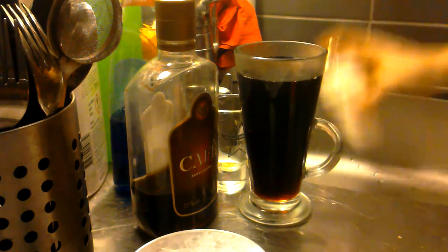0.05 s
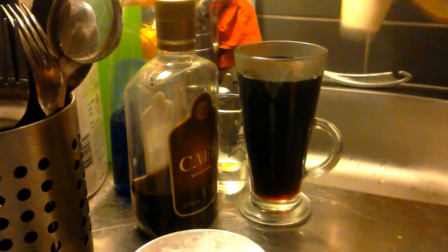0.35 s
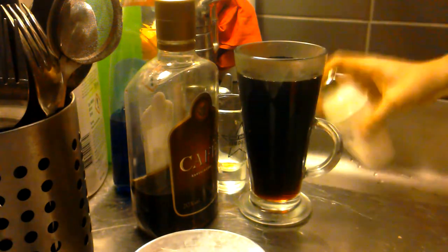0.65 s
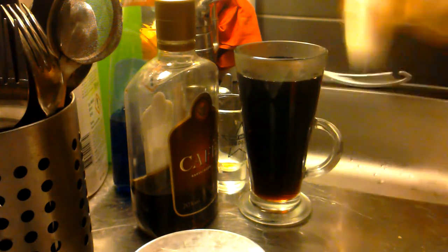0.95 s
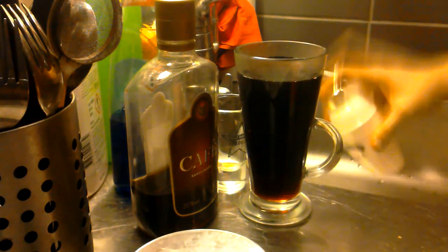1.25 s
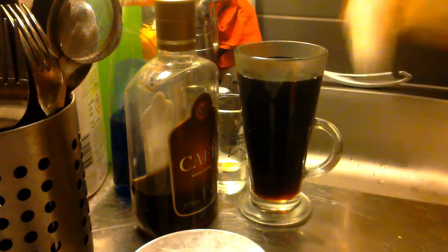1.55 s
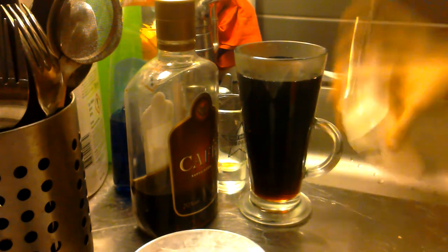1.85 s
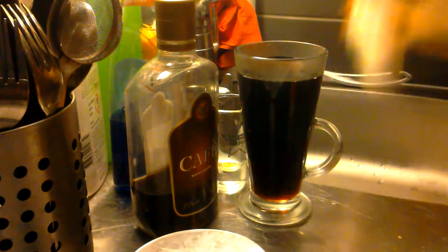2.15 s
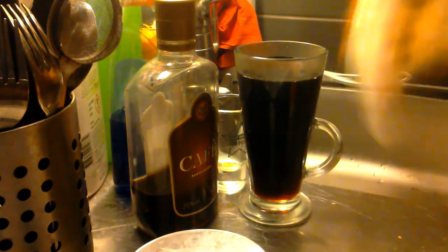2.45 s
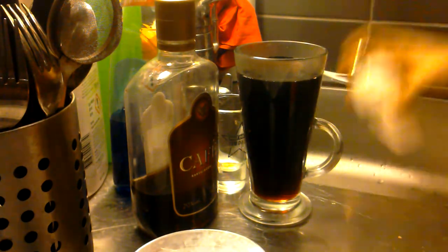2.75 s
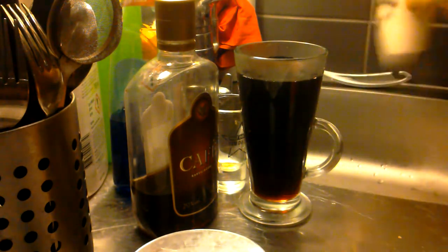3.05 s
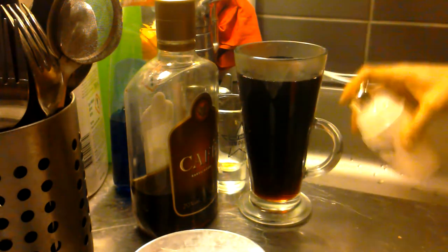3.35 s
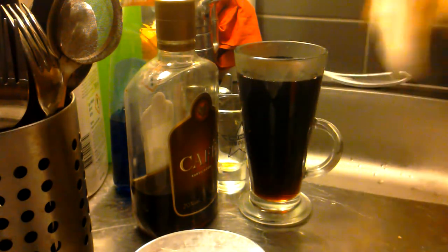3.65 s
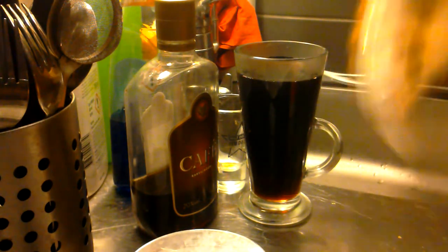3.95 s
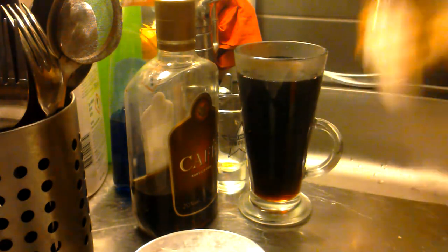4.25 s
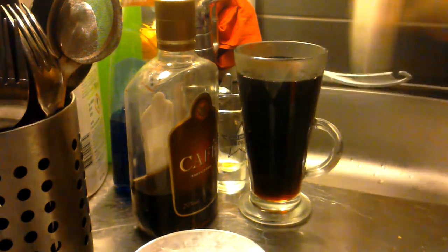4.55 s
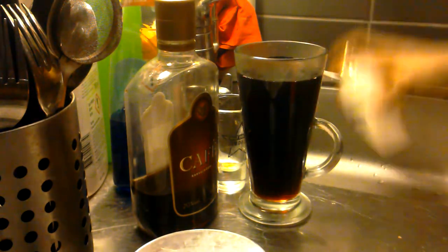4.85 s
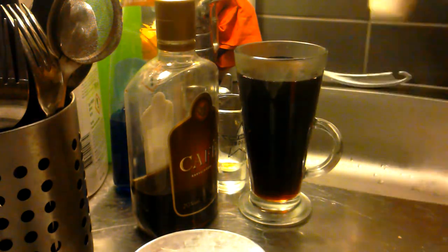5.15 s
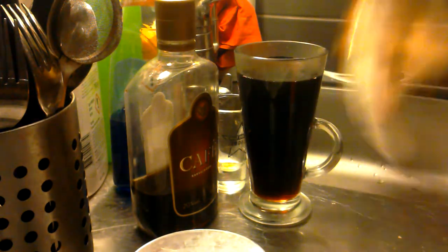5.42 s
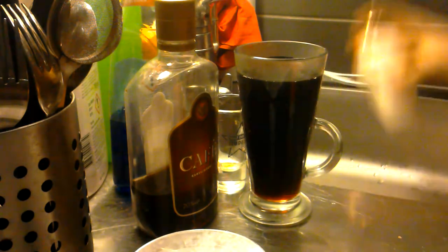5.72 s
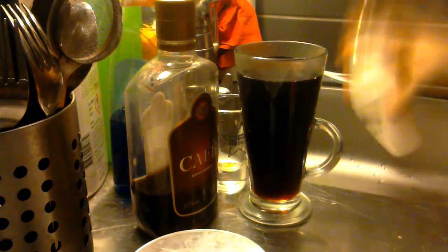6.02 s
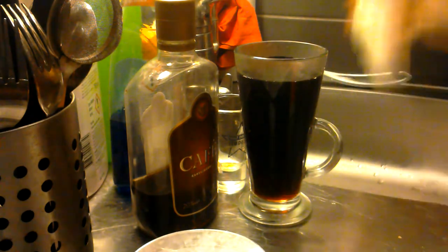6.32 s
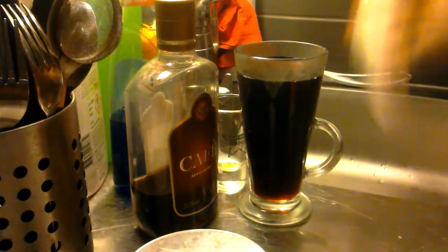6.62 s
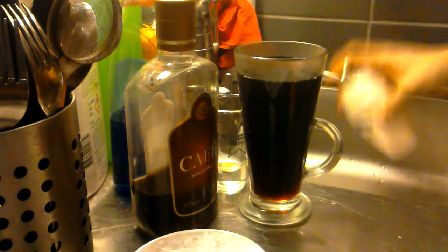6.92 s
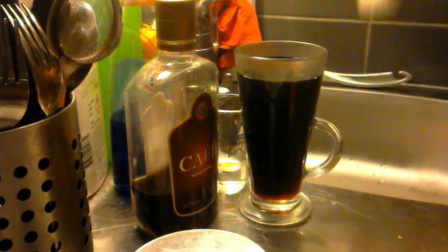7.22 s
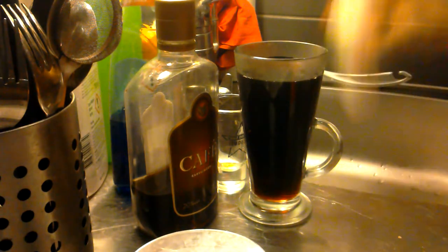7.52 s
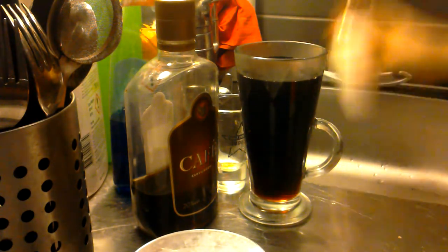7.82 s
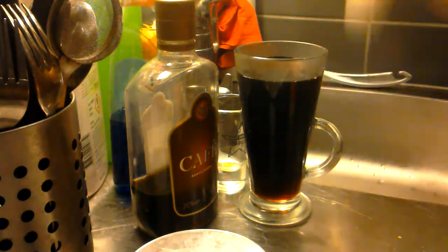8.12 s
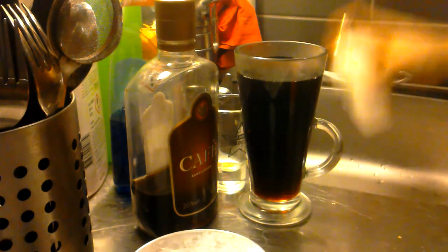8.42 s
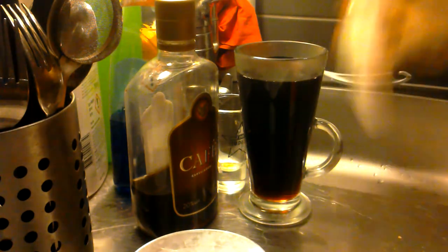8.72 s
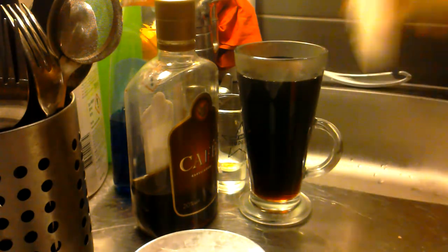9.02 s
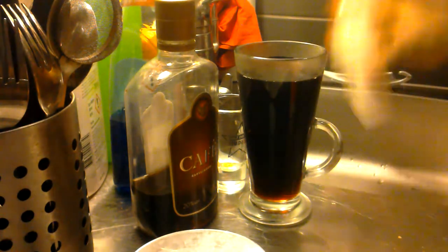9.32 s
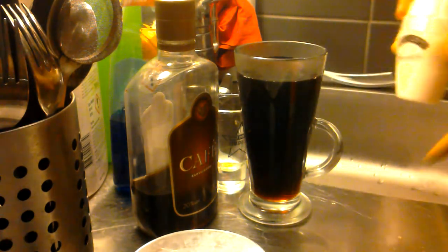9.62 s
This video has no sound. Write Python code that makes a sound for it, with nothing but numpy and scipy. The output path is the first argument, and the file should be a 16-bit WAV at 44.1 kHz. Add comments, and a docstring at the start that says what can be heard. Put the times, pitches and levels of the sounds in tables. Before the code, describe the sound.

Close by, liquid sloshes rapidly back and forth inside a small plastic bottle, about five shakes a second. Each turn gives a short, wet splash with spray, popping bubbles and a light hollow ring. After about nine seconds it settles with a faint hiss. Hard kitchen surfaces add a slight, short echo, over a quiet hum and a few soft bumps of stirred air.

```python
"""In a kitchen, a hand shakes a small, part-filled plastic bottle about five times a second.
At each turn the liquid hits an end of the bottle and breaks into spray and bubbles; trapped air rings
and the plastic wall thuds. A short fizz follows as the bottle comes to rest. Tiles and steel throw the
sound back, over a faint room hum and the low rumble of air stirred by the arm."""
import sys
import numpy as np
from scipy import signal
from scipy.fft import rfft, irfft, next_fast_len
from scipy.io import wavfile
from scipy.ndimage import uniform_filter1d

SR = 44100
rng = np.random.default_rng(int(sys.argv[2]) if len(sys.argv) > 2 else 0)


def dump(signal):
    """Clip the signal to [-1, 1] and save it as 16-bit WAV at the path in sys.argv[1]."""
    limited = np.clip(np.atleast_2d(signal).T, -1, 1)
    pcm = np.round(limited * 32767).astype(np.int16)
    wavfile.write(sys.argv[1], SR, pcm)


N = 430857

# A relative_db column only compares rows; the overall loudness is set where the table is used.
# tone of the steady room noise: frequency_hz, relative_db
ROOM_TONE = [(20, 5.5), (60, 1), (170, -2), (240, -13), (420, -6.5), (750, -11.5), (1000, -10.5),
             (2000, -11), (15500, -11)]
# hum of the mains and appliances: pitch_hz, level_db
HUM_NOTES = [(38.5, -70.5), (120, -70.5)]
# strength of the stirred air: time_s, rumble_relative_db, flutter_relative_db
AIR_STRENGTH = [(0, -60, -73), (1.63, -55, -60), (1.9, -57, -66), (2.83, -67.5, -62.5), (4.6, -54, -68),
                (7.3, -63.5, -68), (7.6, -56, -58.5), (9.31, -52, -59), (9.35, -37.5, -48.5),
                (9.52, -51.5, -61), (9.68, -55, -60), (9.77, -40, -44.5)]
# tone of the air's deep rumble: frequency_hz, relative_db
RUMBLE_TONE = [(10, -19), (25, -4.5), (40, -7), (62, -8.5), (100, -70), (250, -72)]
# tone of the air's higher flutter: frequency_hz, relative_db
FLUTTER_TONE = [(40, -61), (80, -2.5), (130, -3), (180, -2), (240, -55), (600, -44)]
# soft bumps of the hand and the stirred air: start_s, relative_db
HAND_BUMPS = [(1.07, -46), (1.299, -55), (1.67, -39.5), (5.787, -44), (8.699, -37), (9.34, -46.5),
              (9.431, -46)]
# time the kitchen's echo takes to fade by 60 dB: frequency_hz, fade_s
ECHO_FADE = [(300, 0.066), (1200, 0.17), (4500, 0.22), (15000, 0.053)]
# tone of the closing fizz: frequency_hz, relative_db
FIZZ_TONE = [(2000, -38), (7000, -5), (11000, 0), (16000, -4)]
# tone of the flexing plastic wall: frequency_hz, relative_db
THUD_TONE = [(90, -38), (150, -6), (185, -2), (240, -25.5), (320, -6.5), (500, -47)]
# tone of the splashing heard through the wall: frequency_hz, relative_db
SPLASH_TONE = [(150, -43), (250, -20), (420, -9.5), (750, -9), (900, -5), (1250, -1), (2000, -3),
               (3200, -1.5), (4600, 2), (6500, -2), (10000, -4), (14000, -9), (16000, -18)]
# notes at which the bottle and its air ring: pitch_hz, width_hz, boost_db
BOTTLE_NOTES = [(431, 56, 7), (573, 39, 9.5), (676, 16.6, 10), (865, 105, 7.5), (990, 42, 4), (1508, 14, 0),
                (1577, 13, -1), (2010, 71, 5.5), (2760, 150, 2)]
# notes of the free air after a slap: pitch_hz, width_hz, gain_db
SLAP_AIR_NOTES = [(465, 43, -8), (1490, 41, 4), (3430, 110, -10.5)]
# notes of the free air after a crash: pitch_hz, width_hz, gain_db
CRASH_AIR_NOTES = [(957, 50, -3.5), (2040, 120, -17)]
# large pockets of trapped air: start_s, pitch_hz, relative_db
AIR_POCKETS = [(0.226, 2930, -34.5), (0.443, 2780, -39), (0.764, 4130, -38), (0.792, 1850, -31),
               (0.85, 2830, -40), (1.25, 3720, -43), (1.412, 650, -38.5), (1.952, 1480, -37.5),
               (2.022, 4400, -31), (2.06, 4330, -26.5), (2.111, 3400, -30.5), (2.147, 1380, -38),
               (2.227, 2560, -26), (2.426, 2030, -32), (2.787, 1270, -33.5), (3.008, 1350, -38),
               (3.061, 667, -38), (3.085, 910, -38), (3.711, 2440, -30), (3.732, 2000, -34),
               (3.932, 982, -26), (4.073, 2780, -33.5), (4.275, 906, -37.5), (4.337, 4300, -30.5),
               (4.682, 1550, -35), (5.188, 890, -34.5), (5.405, 1330, -27), (5.593, 1930, -31.5),
               (5.717, 3370, -33), (5.755, 2980, -38), (6.372, 1950, -41), (6.534, 1130, -35),
               (6.622, 915, -40), (6.751, 1510, -34.5), (6.988, 1440, -36), (7.166, 1930, -43),
               (7.266, 1330, -34.5), (7.429, 1444, -39), (7.52, 630, -41), (7.887, 2890, -36),
               (8.165, 5000, -30.5), (8.259, 1190, -37), (8.332, 1314, -34), (8.389, 2080, -41),
               (8.497, 1530, -32.5), (8.531, 664, -36), (8.711, 1990, -36), (9.178, 2600, -39.5),
               (9.312, 2620, -36)]
# A splash has three bands: body (low), middle and spray (high). body_db and spray_db shift the outer two.
# the liquid slaps one end of the bottle: start_s, relative_db, rise_s, body_db, spray_db
END_SLAPS = [(0.064, -41, 0.035, -9, -1.5), (0.284, -36.5, 0.019, -4, -1.5), (0.506, -39, 0.0056, 3.5, 2),
             (0.698, -33, 0.016, -7, -5.5), (0.91, -45, 0.018, 4, 7.5), (1.122, -36.5, 0.0086, 3, 2),
             (1.315, -35.5, 0.017, -5.5, -6), (1.522, -33, 0.01, -3.5, -1), (1.726, -33.5, 0.013, -5, -3),
             (1.923, -37.5, 0.027, -3.5, -5), (2.137, -36.0, 0.015, -4, -4), (2.342, -38.5, 0.024, 2, -2.5),
             (2.562, -37.5, 0.0054, 3, -6), (2.762, -38, 0.0038, -2, -7), (2.999, -35.5, 0.0067, -2, -3.5),
             (3.2, -42.5, 0.013, 0, 0), (3.406, -39.5, 0.022, 0, -3), (3.637, -34, 0.0045, -7.5, -7.5),
             (3.843, -38.5, 0.016, -2, 1.5), (4.053, -33, 0.0071, -2, -2), (4.249, -37.5, 0.014, -16, -4),
             (4.469, -37.5, 0.004, 7, 2), (4.675, -35.5, 0.005, 3, 1.5), (4.879, -43, 0.024, 4, -1),
             (5.096, -39, 0.02, 3, -3), (5.294, -38.5, 0.029, -4, -4.5), (5.507, -42, 0.019, 2, -3),
             (5.708, -37, 0.007, -4.5, -1), (5.875, -36.5, 0.0029, -1, -7), (6.099, -34.5, 0.0038, 4, -4),
             (6.299, -40, 0.016, 1, -8), (6.52, -40.5, 0.0098, 2.5, -4), (6.743, -39, 0.008, 2.5, 1.5),
             (6.967, -41, 0.017, 2, -2), (7.152, -44, 0.059, -2, -5), (7.412, -38.5, 0.015, -1.5, -3),
             (7.611, -40, 0.002, -12, -9), (7.844, -36.5, 0.0027, -5, 0), (8.023, -34, 0.009, -1.5, -1.5),
             (8.247, -39, 0.007, 3, -2), (8.432, -40.5, 0.017, 7, -1), (8.619, -37, 0.004, 2.5, 0),
             (8.786, -40.5, 0.036, 5.5, -5), (8.995, -36.5, 0.01, 4, -2), (9.209, -39.0, 0.0033, 3, 0)]
# the liquid crashes into the other end; the last row is a faint, bright hiss as the shaking stops:
# time_s, relative_db, run_up_db, body_db, spray_db
CRASHES_AND_HISS = [(0.016, -43, 3, -1.5, -1), (0.171, -32.5, -3.5, 0.5, -1), (0.38, -31.5, -7, -2, 2),
                    (0.591, -35, -9, 2.5, 4), (0.792, -33, -3.5, 0, 3.5), (1.011, -35.5, -2.5, -0.5, -1),
                    (1.24, -41.5, -5, -17, -1), (1.409, -32.5, -3, -3, 0.5), (1.609, -33, -8, -1.5, 2.5),
                    (1.828, -43, 2, -16, 0.5), (2.019, -33, -13.5, -2.5, -0.5),
                    (2.228, -27.5, -13.5, -2, 1), (2.444, -32, -16, -3, 2.5), (2.661, -37.5, -11, -4, 3.5),
                    (2.866, -33.5, -11, 1, 2.5), (3.081, -34.5, -5.5, 3, -1.5), (3.291, -34.5, 0.5, 3.5, 1),
                    (3.507, -34.5, -9, -4, 1.5), (3.717, -29.5, -10, 0.5, -1.5),
                    (3.929, -30, -4.5, -0.5, -2.5), (4.142, -35.5, 0, -1.5, 0), (4.338, -33, -9, 4, 0),
                    (4.548, -38.5, -5.5, 2, 1), (4.748, -38.5, -18, -2, -4), (4.962, -41, 0.5, -2, -1),
                    (5.191, -36.5, -2.5, 1, 2), (5.4, -29.5, -14, 6, 1), (5.594, -35.5, -9, 3, -5),
                    (5.79, -31.0, -11.5, 4, -1), (5.981, -33.5, -9, 2.5, -1), (6.198, -41.0, -1, -6, -1),
                    (6.398, -50, -3, 5, 1), (6.593, -40, -7, 1.5, 0.5), (6.845, -34.5, -12, 3.5, -5),
                    (7.062, -30, -17, 0, -3.5), (7.284, -37.5, -5, 4.5, 0.5), (7.506, -32.5, -6.5, 2, 0),
                    (7.715, -36, -0.5, 1.5, 0), (7.887, -34.5, -6, -3.5, -2), (8.133, -43.5, 1, 2, 6),
                    (8.332, -36, 0.5, 2.5, -2), (8.496, -33.5, -8, -6, 0), (8.699, -32, -5, 1.5, -1),
                    (8.897, -32, -14.5, 1, 0), (9.087, -34.5, -15, 4, 3.5), (9.314, -38.5, -0.5, -8, -3.5),
                    (9.428, -52.5, 6.5, 3, 7)]
# stray lumps of liquid land between the turns: start_s, relative_db, brightness_db
STRAY_LUMPS = [(0.219, -43, 1), (0.564, -38, 1), (0.876, -40.5, 1), (0.968, -35, 1.5), (1.199, -37.5, 6.5),
               (1.385, -36.5, 2), (1.468, -45, 2), (1.577, -38.5, 2), (1.644, -46.5, 9), (2.057, -40.0, 0),
               (2.111, -53, -2), (2.422, -33.5, -6.5), (2.495, -44.5, 3), (2.787, -36.5, 0),
               (2.919, -56.5, 23), (2.969, -44, 1), (3.055, -40, 4), (3.343, -43.5, 2.5), (3.698, -44, 6),
               (3.894, -39, -2), (4.308, -42, 9), (4.772, -40, 0), (4.984, -39, 1), (5.375, -40, 1),
               (5.459, -42, -5), (5.651, -47, -7), (5.757, -40.5, -1), (5.897, -34, -2.5),
               (5.954, -39.5, -3), (6.234, -40, 6), (6.43, -42.5, -3.5), (6.616, -40, -1),
               (6.818, -39, 0.5), (7.039, -41, -9.5), (7.271, -39.5, -5), (7.64, -36.5, -4),
               (7.923, -40.5, -1), (8.052, -38, -4), (8.159, -41, 4.5), (8.378, -44.5, -1),
               (8.513, -34, -2), (8.572, -42.0, 4.5), (8.872, -34, 2.5), (8.939, -42.5, 1.5),
               (9.127, -42, 3), (9.178, -45, 2), (9.268, -40.0, -1), (9.54, -47, -9)]

# how each kind of surge dies away: collapse_s, churn_db, churn_s
SLAP_DRAIN, CRASH_DRAIN, LUMP_DRAIN = (.013, -11, 0.085), (0.014, -13.5, 0.042), (0.0093, -5.5, 0.023)
# time for the front of the liquid to meet the wall
SLAP_CONTACT_S, CRASH_CONTACT_S, LUMP_CONTACT_S = .008, .002, .007


def gain_of(db):
    """Turns decibels into a number to multiply a sound by."""
    return 10 ** (np.asarray(db) / 20)


def evened(x):
    """Scales a signal to an average strength (rms) of 1."""
    return x / np.sqrt(np.mean(x ** 2) + 1e-20)


def look_up(table, hz):
    """Reads between the rows of a table, on a scale where octaves are evenly spaced."""
    row_hz, value = np.transpose(table)
    return np.interp(np.log(hz + 1), np.log(row_hz + 1), value)


def add(mix, start_s, sound):
    """Mixes a sound in at the given time."""
    part = mix[max(round(start_s * SR), 0):][:len(sound)]
    part += sound[:len(part)]


def noise(tone):
    """Steady noise of strength 1, shaped by rows of frequency_hz, relative_db."""
    size = next_fast_len(N)
    colour = gain_of(look_up(tone, np.fft.rfftfreq(size, 1 / SR)))
    return evened(irfft(rfft(rng.standard_normal(size)) * colour, size)[:N])


def linger(x, seconds):
    """Smooths a signal so that every change leaves a fading tail."""
    keep = np.exp(-1 / (seconds * SR))
    return signal.lfilter([1 - keep], [1, -keep], x + 1e-18)


def ringing(x, turns, width_hz):
    """Rings along with x at a note whose cycles are counted by turns; a narrow width rings longer."""
    spin = np.exp(2j * np.pi * turns)
    return 2 * (spin * linger(x / spin, 1 / (np.pi * width_hz))).real


def background(room_db=-53.5, gust_db=3.5):
    """Room noise, a wavering hum, and stirred air buffeting the microphone in gusts."""
    t = np.arange(N) / SR
    time_s, rumble_db, flutter_db = np.transpose(AIR_STRENGTH)
    air = gain_of(np.interp(t, time_s, rumble_db) - 3) * noise(RUMBLE_TONE)
    air += gain_of(np.interp(t, time_s, flutter_db) - 4) * noise(FLUTTER_TONE)
    air *= gain_of(gust_db * noise([(8, 0), (20, -20), (60, -100)]))
    waver = 0.55 * noise([(2, 0), (8, -20), (40, -100)])
    hum = sum(gain_of(db) * np.sqrt(2) * np.sin(2 * np.pi * hz * t + waver) for hz, db in HUM_NOTES)
    return air + hum + gain_of(room_db) * noise(ROOM_TONE)


def kitchen_echo(x, first_s=0.0062, changes_per_s=23, patterns=3):
    """Echoes off tiles and steel, the top treble dying first; their pattern shifts as the bottle moves."""
    out, place = np.zeros(N), np.arange(N) / SR * changes_per_s
    for k in range(patterns):
        echoes = rng.standard_normal(SR // 2) * (np.arange(SR // 2) > first_s * SR)
        hz, t, spectrum = signal.stft(echoes, SR, nperseg=256)
        fade = gain_of(-60 * t / look_up(ECHO_FADE, hz)[:, None])
        tail = signal.istft(spectrum * fade, SR)[1]
        away = np.minimum(abs((place - k) % patterns - patterns / 2), 1)  # the patterns take turns
        out += signal.oaconvolve(x * np.cos(np.pi / 2 * away), tail / np.linalg.norm(tail))[:N]
    return out


def ping(t, hz, cycles, glide):
    """A note that dies within some cycles, like a pulsing bubble; glide slides its pitch."""
    age = t * hz / cycles
    turns = hz * t + glide * cycles * (age - 1 + np.exp(-age))
    return np.sin(2 * np.pi * turns) * np.exp(-age) * (1 - np.exp(-t * hz))


def hand_bumps():
    """The hand and the stirred air make dull, low thumps that die quickly."""
    out, t = np.zeros(N), np.arange(SR // 10) / SR
    pitches_hz = 125 * rng.uniform(0.764, 1.404, len(HAND_BUMPS))
    for (start_s, db), hz in zip(HAND_BUMPS, pitches_hz):
        add(out, start_s, gain_of(db) * ping(t, hz, cycles=2.6, glide=0))
    return out


def fizz(peak_s=9.465, width_s=0.032, level_db=-46):
    """A brief, thin hiss as the bottle comes to rest."""
    swell = np.exp(-((np.arange(N) / SR - peak_s) / width_s) ** 2 / 2)
    return gain_of(level_db) * swell * noise(FIZZ_TONE)


def wall_thuds(power, gain_db=-25, ring_s=0.0074):
    """The plastic wall flexes with a dull thud under the body of each surge."""
    return gain_of(gain_db) * np.sqrt(linger(power[0], ring_s)) * noise(THUD_TONE)


def bottle_ring(x, size=8192):
    """The wall and the air inside colour the splash and ring on briefly after it."""
    hz = abs(np.fft.fftfreq(size, 1 / SR))
    peaks_db = sum(boost / (1 + (2 * (hz - pitch) / width) ** 2) for pitch, width, boost in BOTTLE_NOTES)
    colour = gain_of(look_up(SPLASH_TONE, hz) + peaks_db)
    # the bottle's answer to one click, built so that the ringing comes after the click
    response = np.fft.ifft(np.exp(np.conj(signal.hilbert(np.log(colour))))).real
    return signal.oaconvolve(x, response / np.linalg.norm(response))[:N]


def air_space(x, crossing_s=0.015):
    """The free air moves to the far end at every turn and rings with the splashing."""
    t, out = np.arange(N) / SR, x.copy()
    ends = (SLAP_AIR_NOTES, END_SLAPS, CRASHES_AND_HISS), (CRASH_AIR_NOTES, CRASHES_AND_HISS, END_SLAPS)
    for notes, arrivals, departures in ends:
        switches = [(row[0], 1) for row in arrivals] + [(row[0] + crossing_s, 0) for row in departures]
        switch_s, is_on = np.transpose(sorted(switches))
        drive = x * is_on[np.searchsorted(switch_s, t) - 1]
        for hz, width_hz, db in notes:
            out += gain_of(db) * ringing(drive, hz * t, width_hz)
    return out


def air_pockets(step_s=.0035, sag=0.023, wander=0.069, dying=0.73, pulses=5):
    """Trapped air gulps in quick, uneven pulses that sink and weaken; small pockets snap harder."""
    out, t = np.zeros(N), np.arange(SR // 30) / SR
    step = np.arange(pulses)
    for (start_s, hz, db), (late, swerve) in zip(AIR_POCKETS, rng.random((len(AIR_POCKETS), 2, pulses))):
        times_s = start_s + step_s * (step + late / 2)
        pitches_hz = hz * (1 - sag * (step - 1) + wander * (2 * swerve - 1))
        strengths = gain_of(db) * dying ** step * np.sqrt(hz / 1200)
        for at_s, pitch_hz, strength in zip(times_s, pitches_hz, strengths):
            # the churning liquid squeezes the pocket unevenly, which roughens its ring
            churn = linger(linger(rng.standard_normal(len(t)), 1 / hz), 1 / hz)
            squeeze = 1 + 0.47 * evened(churn)
            add(out, at_s, strength * squeeze * ping(t, pitch_hz, cycles=5.45, glide=-0.018))
    return out


def band_shares(hz, body_hz=1500, spray_hz=5700):
    """Splits power among the body, the middle and the spray of a splash."""
    body = 1 / (1 + (hz / body_hz) ** 6)
    below_spray = 1 / (1 + (hz / spray_hz) ** 6)
    return np.array([body, np.maximum(below_spray - body, 0), 1 - below_spray])


def bubbles(power, per_s, low_hz, high_hz, cycles, glide_spread, spread_db):
    """Bubbles ring as strongly as the surge that folds them in; moving liquid slides their pitch."""
    out, t = np.zeros(N), np.arange(SR // 10) / SR
    for when, pitch, size, ring, slide in rng.random((int(per_s * N / SR), 5)):
        hz, at = low_hz * (high_hz / low_hz) ** pitch, int(when * N)
        life_cycles = cycles * (.5 + ring)
        strength = np.sqrt(band_shares(hz) @ power[:, at] / life_cycles) * hz / high_hz
        strength *= gain_of(spread_db * (2 * size - 1))
        glide = 0.019 + glide_spread * (2 * slide - 1)
        span = t[:int(5 * life_cycles / hz * SR)]
        add(out, at / SR, strength * ping(span, hz, life_cycles, glide))
    return out


def gurgle(x, power, open_hz=800, shut_hz=3000, opening_db=-39):
    """A surge tears open a hollow in the liquid; its note falls as it grows."""
    hollow = linger(power[1], 0.029) / gain_of(opening_db) ** 2
    hz = open_hz + (shut_hz - open_hz) / (1 + hollow ** 2)
    return x + 0.45 * ringing(x, np.cumsum(hz) / SR, width_hz=220)


def liquid_folds(x, patchy_db=3.0):
    """Folds of liquid open and close, briefly lifting some pitches and dipping others."""
    hz, _, spectrum = signal.stft(x, SR, nperseg=256)
    patches = rng.standard_normal(spectrum.shape)
    for _ in range(2):
        patches = uniform_filter1d(uniform_filter1d(patches, size=5, axis=0), size=4, axis=1)
    depth_db = patchy_db / (1 + (hz[:, None] / 9000) ** 2)  # the fine spray stays smooth
    lift = gain_of(depth_db * np.clip(evened(patches), -2, 2))
    return signal.istft(spectrum * evened(lift), SR)[1][:len(x)]


def droplets(power, per_s=7000, spread_db=1.5):
    """Many tiny drops of uneven size land over the hiss of foam, swelling with each surge."""
    size = next_fast_len(N)
    hits = gain_of(spread_db * np.minimum(rng.exponential(1, size), 4)) * rng.choice([-1, 1], size)
    hits = evened(hits * (rng.random(size) < per_s / SR))
    foam = 0.5 * rng.standard_normal(size)
    patter = evened(liquid_folds(hits + foam))
    bands = irfft(rfft(patter) * band_shares(np.fft.rfftfreq(size, 1 / SR)), size)[:, :N]
    return (bands * np.sqrt(power)).sum(0)


def drain(t, collapse_s, churn_db, churn_s):
    """Power of a surge t seconds after its peak: a quick collapse, then churning that dies away."""
    t, churn = np.maximum(t, 0), gain_of(churn_db) ** 2
    return (1 - churn) * np.exp(-(t / collapse_s) ** 2) + churn * np.exp(-(t / churn_s) ** 2)


def surges(first_contact_share=.22, run_up_s=0.0094, lead_s=.25):
    """Power of body, middle and spray over time: slaps swell, crashes rush up and hit, lumps just land."""
    power = np.zeros((3, N + SR))
    t = np.arange(-lead_s, lead_s, 1 / SR)

    def ramp(seconds):
        return np.clip(t / seconds, 0, 1)

    def land(at_s, db, swell, colour_db):
        for band, tilt_db in zip(power, colour_db):
            add(band, at_s, swell * gain_of(db + tilt_db) ** 2)

    for at_s, db, rise_s, body_db, spray_db in END_SLAPS:
        build = ramp(SLAP_CONTACT_S) * (first_contact_share + (1 - first_contact_share) * ramp(rise_s) ** 2)
        land(at_s, db, build * drain(t - rise_s, *SLAP_DRAIN), (body_db, 0, spray_db))
    for at_s, db, run_up_db, body_db, spray_db in CRASHES_AND_HISS:
        rush = gain_of(run_up_db) ** 2 * np.exp(np.minimum(t, 0) / run_up_s)
        build = rush + (1 - rush) * ramp(CRASH_CONTACT_S)
        land(at_s, db, build * drain(t, *CRASH_DRAIN), (body_db, 0, spray_db))
    for at_s, db, bright_db in STRAY_LUMPS:
        swell = ramp(LUMP_CONTACT_S) * drain(t - LUMP_CONTACT_S / 2, *LUMP_DRAIN)
        land(at_s, db, swell, (-bright_db, 0, bright_db))
    balance = gain_of([[-1], [1.21], [1.0]]) ** 2  # body, middle, spray
    return power[:, round(lead_s * SR):][:, :N] * balance


def scene():
    """Surges of liquid drive the splash, the bottle colours it and the kitchen echoes it."""
    power = surges()
    splash = gurgle(gain_of(-1.5) * droplets(power), power)
    splash += gain_of(9.5) * bubbles(power, per_s=600, low_hz=600, high_hz=8000,
                                     cycles=5, glide_spread=0.079, spread_db=-2)
    # fewer, larger bubbles keep popping while the liquid settles
    splash += gain_of(8.5) * bubbles(linger(power, 0.02), per_s=80, low_hz=898, high_hz=3820,
                                     cycles=11, glide_spread=0.17, spread_db=2)
    liquid = air_space(bottle_ring(splash) + gain_of(0.5) * air_pockets())
    echo = gain_of(-13) * kitchen_echo(liquid)
    return (liquid + echo + wall_thuds(power) + hand_bumps() + fizz() + background())[None]


def record(dry, cutoff_hz=15850):
    """Cuts away the very highest treble."""
    treble_cut = signal.firwin(511, cutoff_hz, window=("kaiser", 8), fs=SR)
    return signal.oaconvolve(dry, treble_cut[None], "same")


dry = scene()
out = record(dry)
dump(out)
```